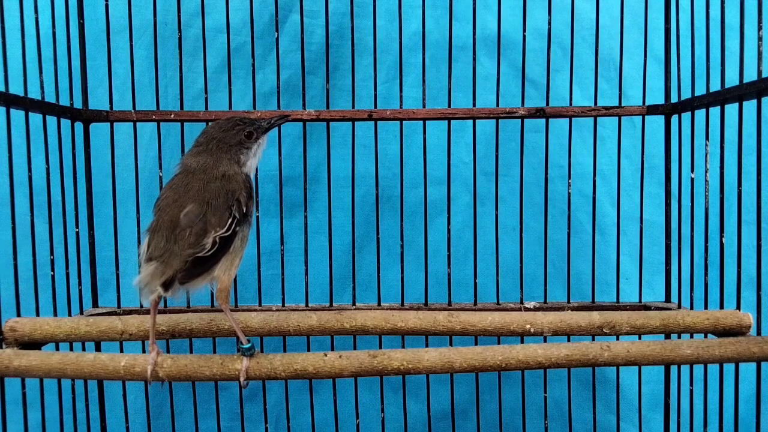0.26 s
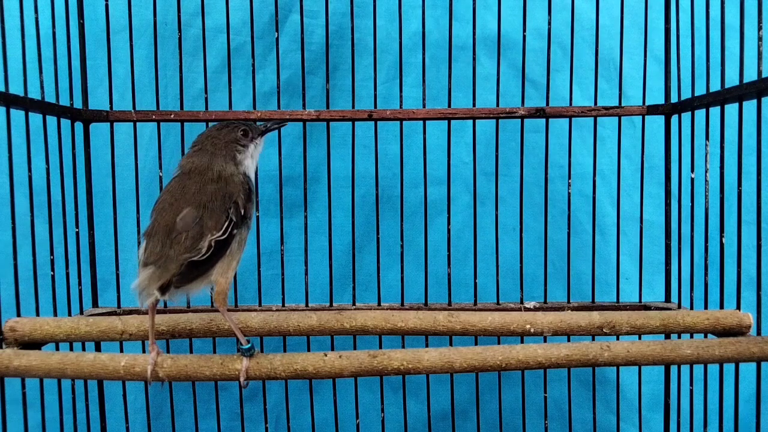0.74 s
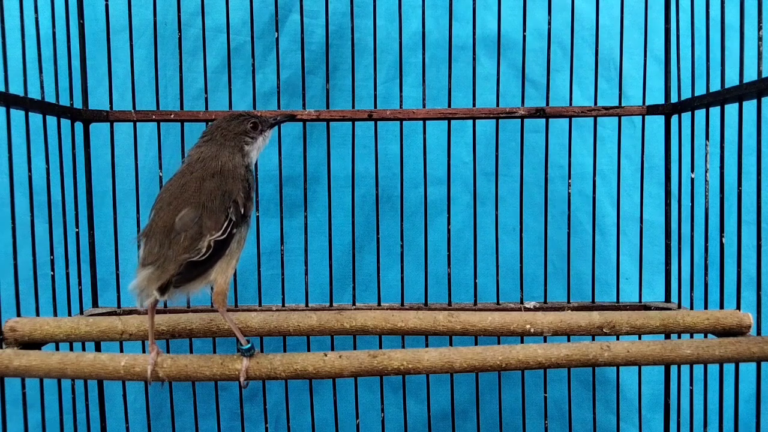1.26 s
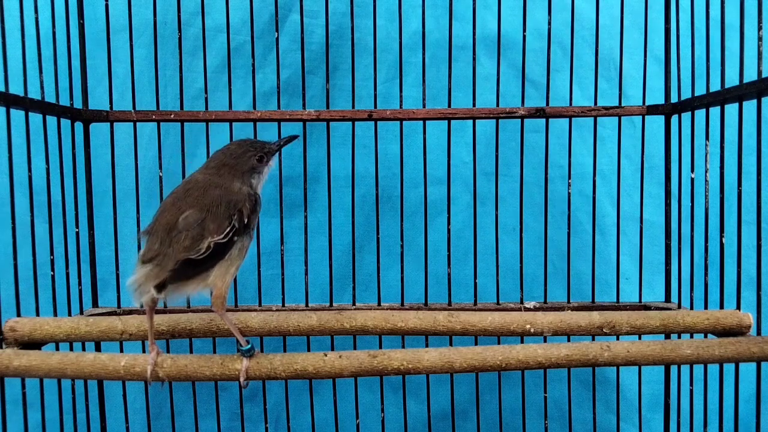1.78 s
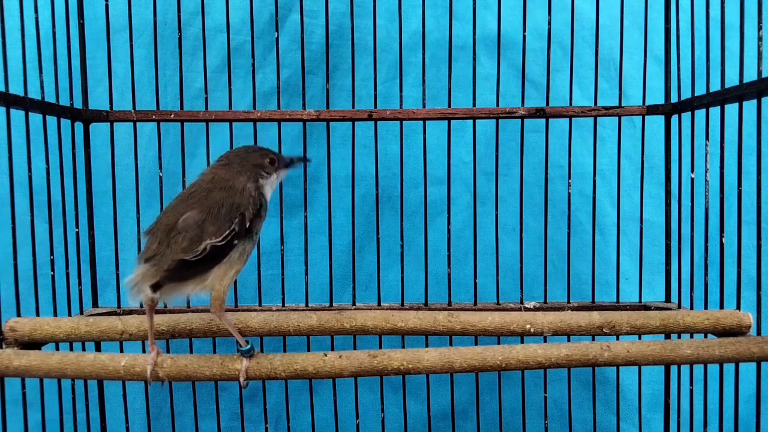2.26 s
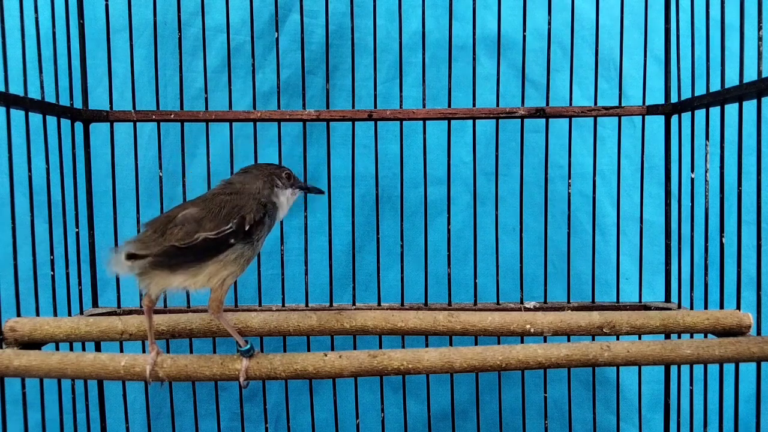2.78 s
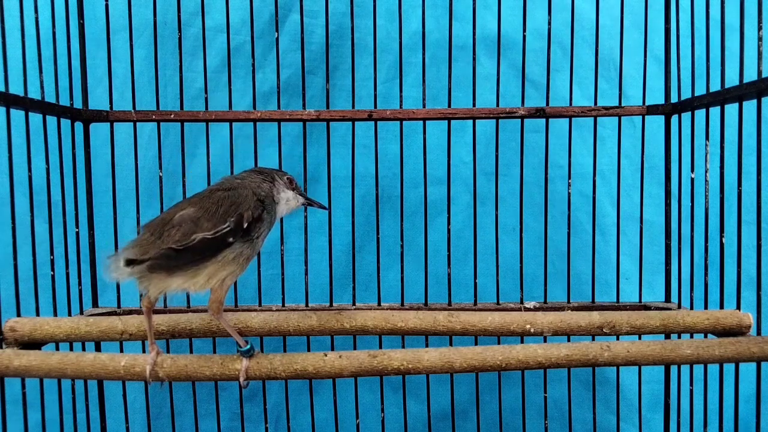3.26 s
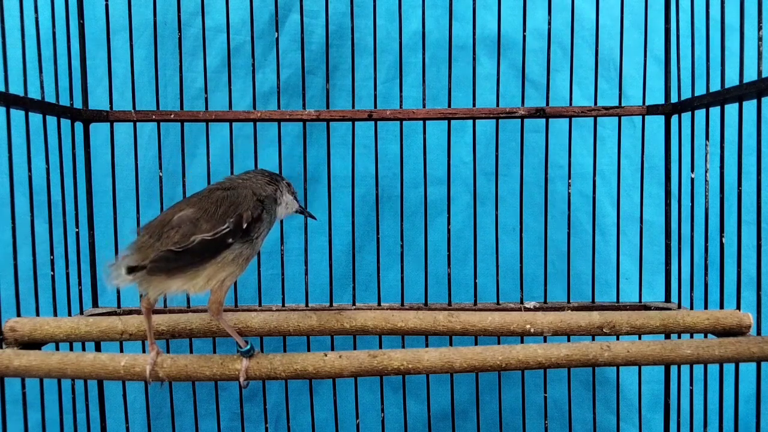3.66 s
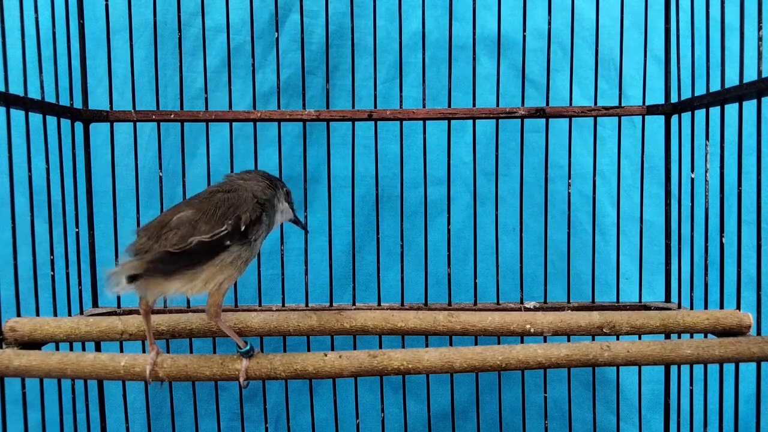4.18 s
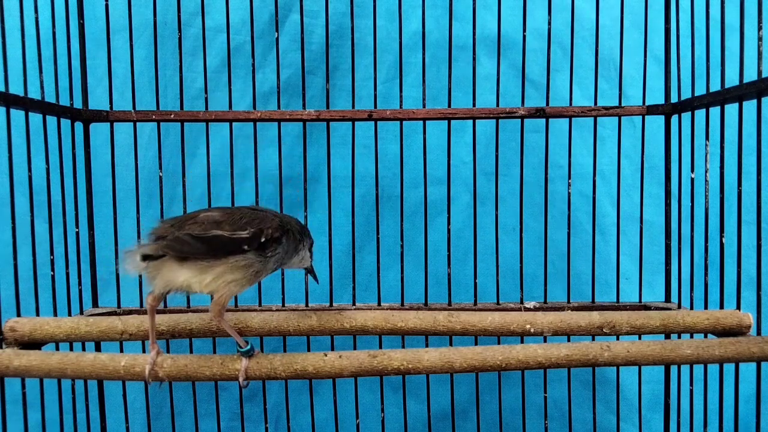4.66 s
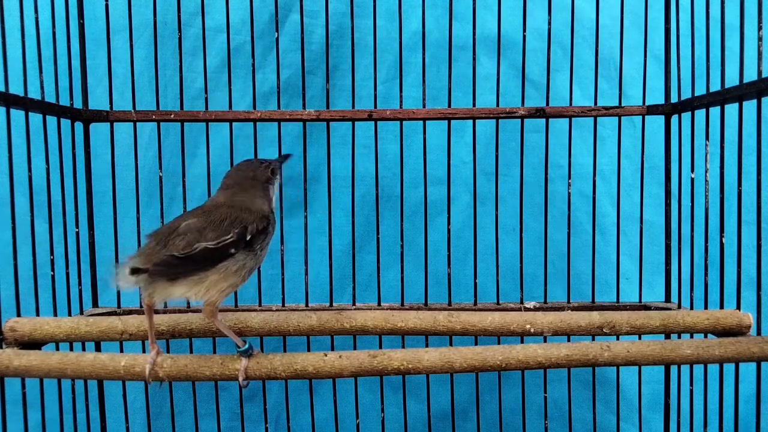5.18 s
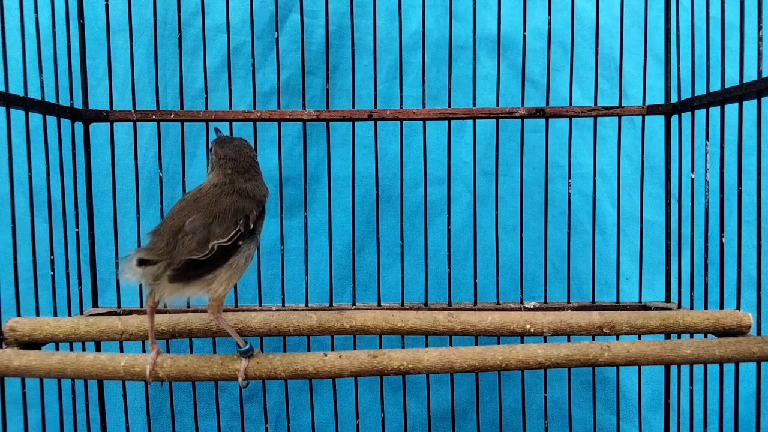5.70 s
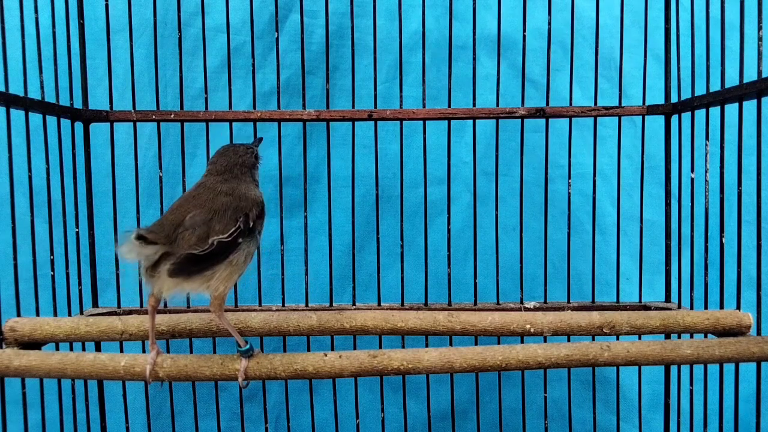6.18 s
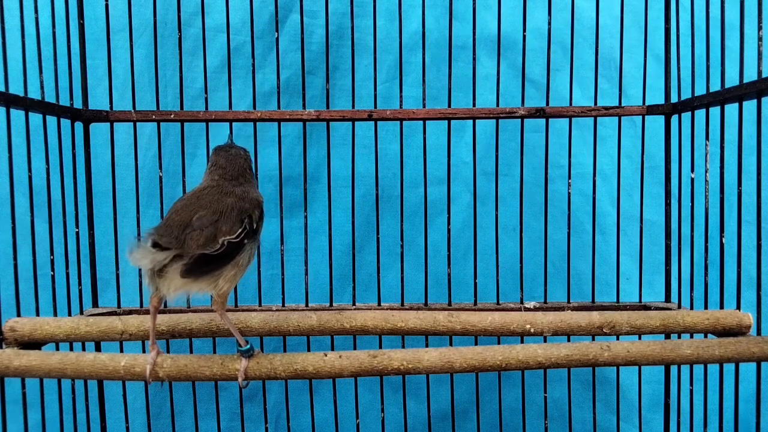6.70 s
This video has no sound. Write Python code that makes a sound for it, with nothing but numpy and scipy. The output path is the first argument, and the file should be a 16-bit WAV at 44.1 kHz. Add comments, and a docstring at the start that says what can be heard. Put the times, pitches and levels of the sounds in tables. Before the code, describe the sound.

Outdoors, other birds whistle, twitter and rasp at a distance over a patchy leafy hiss. Then a small bird close to the microphone begins loud, sharp, sweeping chips, first scattered, then in a fast even train. A faint engine hum joins. After a pause with far twits and a rasp, the trill returns in two bursts, then breaks into quick double ticks followed by longer slurs. Soft perch taps are scattered throughout.

```python
"""Over leaf hiss a far whistle slides down at once, and other birds soon twit, rasp and scold: gliding sines,
frequency-modulated tones and filtered noise. From 1.6 s a small bird close by sings trains of sharp chips,
each a sine with overtones that flicks up and sweeps down through the resonances of the beak.
A distant engine hum joins at 2.6 s as a sum of orders; soft knocks are damped modes, rustles fading noise."""
import sys
import numpy as np
from scipy import signal
from scipy.fft import rfft, irfft
from scipy.io import wavfile
from scipy.ndimage import uniform_filter1d, minimum_filter1d

SR = 44100
rng = np.random.default_rng(int(sys.argv[2]) if len(sys.argv) > 2 else 0)


def file_out(sig):
    """Save sig as 16-bit WAV at sys.argv[1]."""
    # one column per channel
    cols = np.atleast_2d(sig).T
    # limit, then scale
    lim = np.clip(cols, -1, 1)
    pcm = np.round(lim * 32767).astype(np.int16)
    wavfile.write(sys.argv[1], SR, pcm)


N = 306054


def amp(db):
    """Decibel definition: level to amplitude ratio."""
    return 10 ** (np.asarray(db) / 20)


def evened(x):
    """Power normalisation: scales to an rms of 1."""
    return x / np.sqrt(np.mean(x ** 2) + 1e-20)


def read(points, hz):
    """Frequency response: interpolates (f/Hz, value) points along log frequency."""
    f, value = np.transpose(points)
    return np.interp(np.log(hz + 1), np.log(f + 1), value)


def add(mix, s, sound):
    """Superposition: sums a sound into the mix from s seconds on."""
    part = mix[max(round(s * SR), 0):][:len(sound)]
    part += sound[:len(part)]


def columns(rows):
    """Linear interpolation: start time, then each column as a curve at the sample rate."""
    s, *rest = np.transpose(rows)
    t = np.arange(s[0], max(s[-1], s[0] + .004), 1 / SR)
    return [s[0]] + [np.interp(t, s, c) for c in rest]


def wobble(count, hz):
    """Smoothed noise: a random curve of rms 1 that changes about hz times a second."""
    size = max(int(SR / hz / 2), 1)
    smooth = uniform_filter1d(rng.standard_normal(count), size)
    return evened(uniform_filter1d(smooth, size))


def coloured(x, points):
    """Linear filtering: multiplies the spectrum by a gain curve of (f/Hz, gain/dB)."""
    gain = amp(read(points, np.fft.rfftfreq(len(x), 1 / SR)))
    return irfft(rfft(x) * gain, len(x))


def air():
    """Shaped random spectrum: patchy noise in four bands, where the twitter band follows the treble hiss."""
    # background swells: t/s, relative level of lows/dB, of treble hiss/dB, of rumble/dB
    swell_rows = [(0.0, -49.5, -37, -36.5), (0.13, -47, -27.5, -38.5), (0.27, -43.5, -31, -35),
                  (0.52, -47.5, -30, -40.5), (0.77, -47.5, -34.5, -39), (1.53, -51, -35.5, -42),
                  (1.76, -44.5, -30.5, -42), (2.11, -56.5, -44.5, -49.5), (2.26, -58.5, -41.5, -47),
                  (2.45, -48, -28.5, -42.5), (2.72, -54.5, -39.5, -48), (3.01, -50, -36.5, -41.5),
                  (3.34, -46.5, -30, -38.5), (3.46, -44, -29.5, -42.5), (3.61, -48.5, -30.5, -38.5),
                  (3.92, -49, -32, -41.5), (4.06, -44.5, -34.5, -39), (4.21, -54.5, -40, -42),
                  (4.39, -49.5, -38.5, -42.5), (4.56, -45.5, -32, -38), (4.72, -48, -37, -39),
                  (4.83, -56, -43, -44), (5.14, -50, -36.5, -42), (5.32, -55, -39.5, -42.5),
                  (5.47, -57, -44.5, -45.5), (5.74, -47, -38, -39.5), (6.07, -55, -34, -43),
                  (6.15, -53, -44, -38), (6.4, -54.5, -42, -42.5), (6.67, -41.5, -31, -39.5),
                  (6.82, -48, -33, -40.5), (6.94, -54, -38, -44)]
    # spectrum of the air noise, levelled afresh in each band: f/Hz, relative density/dB
    spectrum = [(12, -65), (20, 2), (86, -7), (172, -11.5), (210, -13), (347, -21), (624, -23),
                (849, -20.5), (1000, -20.5), (2390, -26), (3950, -23.5), (6010, -25.5), (6540, -24.5),
                (9670, -17), (16000, -34.5)]
    # narrow band near 860 Hz: t/s, relative level/dB
    murmur = [(0, -74), (.27, -30), (1.45, -85), (1.74, -35), (2.05, -52), (2.84, -41), (3.03, -34),
              (3.4, -32), (3.56, -44), (4.12, -74), (6.94, -68)]
    twitter_db, twitter_follows = -41, 0.53  # relative mean level, dB of twitter per dB of hiss
    frames, hz = N // 256 + 5, np.fft.rfftfreq(1024, 1 / SR)
    real, imaginary, patches = rng.standard_normal((frames, 513, 3)).T
    patches = uniform_filter1d(patches, size=12, axis=0)
    patches = evened(uniform_filter1d(patches, size=6, axis=1))
    s, lows, hiss, rumble = np.transpose(swell_rows)
    twitter = twitter_db + twitter_follows * (hiss - hiss.mean())
    t = np.arange(frames) * 256 / SR
    level_db = np.array([np.interp(t, s, c) for c in (rumble, lows, twitter, hiss)])
    shape = amp(read(spectrum, hz))
    band = np.digitize(hz, (400, 1900, 7200))
    band_norm = np.sqrt([np.sum(shape[band == k] ** 2) for k in range(4)])
    field = amp(level_db[band]) / band_norm[band][:, None]
    field = uniform_filter1d(field, size=5, axis=0) * shape[:, None]
    murmur_band = np.exp(-((hz[:, None] - 860) / 50) ** 2)
    field += murmur_band * amp(np.interp(t, *np.transpose(murmur)) - 21.5)
    z = (real + 1j * imaginary) * field * amp(2. * patches)
    return 0.63 * signal.istft(z, nperseg=1024, noverlap=768)[1][:N]


def engines():
    """Harmonic superposition: two low hums of whole and half orders, each order wavering in level."""
    # the two hums: t/s, f/Hz, level before the order gains/dB
    hum_rows = [(2.6, 77.8, -54), (2.92, 79, -55), (3.0, 79.7, -46), (3.97, 79.85, -46), (4.25, 80, -61),
                (4.4, 80, -43), (5.23, 79.46, -48), (5.57, 80.1, -55), (5.85, 83.7, -45)]
    drone_rows = [(5.55, 103.7, -64), (5.622, 103.7, -47.5), (5.84, 103.8, -61), (6.052, 102.1, -47.5),
                  (6.255, 104.3, -55), (6.292, 104, -83), (6.4, 102.4, -52.5), (6.784, 97.7, -46.5),
                  (6.94, 100.6, -53)]
    # orders: multiple of f, gain in the hum/dB, gain in the drone/dB
    orders = [(1, 1, 1), (1.5, -37, -5), (2, -19.5, -11), (2.5, -21, -14.5), (3, -12, -33.5)]
    out = np.zeros(N)
    for which, rows in enumerate((hum_rows, drone_rows)):
        s, hz, db = columns(rows)
        turns = 2 * np.pi * np.cumsum(hz) / SR
        tone = np.zeros(len(hz))
        for k, *gains_db in orders:
            waver_db = 2.13 * k * wobble(len(hz), 2.5)
            tone += amp(gains_db[which] + waver_db) * np.sin(k * turns)
        add(out, s, np.sqrt(2) * amp(db) * tone * signal.windows.tukey(len(hz), .05))
    return out


def knocks():
    """Damped modes: dull taps on wood decay exponentially, as do short dry rustles of noise."""
    # taps: t/s, relative level/dB, time to fall 60 dB/s
    taps = [(0.032, -31, 0.037), (1.035, -26.5, 0.049), (2.949, -34.5, 0.051), (3.285, -33, 0.25),
            (4.987, -24.5, 0.061), (5.657, -34.5, 0.044), (5.719, -32, 0.019)]
    # modes of the wood: f/Hz, relative level/dB
    modes = [(130, -21.5), (235, 11.5), (310, -2.5), (520, -8), (900, -5)]
    # rustles: t/s, relative level/dB, time to fall 25 dB/s
    rustles = [(1.038, -44.5, 0.087), (1.455, -61, 0.036), (1.544, -51.5, 0.053), (3.849, -41.5, 0.15)]
    out, t = np.zeros(N), np.arange(8000) / SR
    for s, db, t60 in taps:
        ring = sum(amp(d) * np.sin(2 * np.pi * hz * t) for hz, d in modes)
        add(out, s, amp(db - 10.5 - 60 * t / t60) * ring)
    for s, db, length in rustles:
        colour = [(300, -55), (700, 21.5), (3000, 13), (9000, -2), (16000, -26)]
        puff = coloured(rng.standard_normal(len(t)), colour)
        add(out, s, amp(db + 5.5 - 25 * t / length) * evened(puff))
    return out


def yard(x, t60, delay_s):
    """Reverberation: convolves with taps of random sign that decay by 60 dB in t60 seconds."""
    taps = np.zeros(SR // 2)
    at = np.arange(round(delay_s * SR), len(taps) - 20, 20)
    taps[at + rng.integers(0, 20, len(at))] = rng.choice([-1., 1.], len(at))
    taps *= amp(-60 * np.arange(len(taps)) / SR / t60)
    return signal.fftconvolve(x, taps / np.linalg.norm(taps))[:N]


def whistle(rows, share):
    """Comb interference: a fluttering near sine rises and falls in level as it glides through echoes."""
    s, hz, db = columns(rows)
    blur = share * np.clip(hz / 5500, 0, 1) ** 2  # the air smears high notes more than low ones
    fluttering_hz = hz * (1 + 0.012 * blur * wobble(len(hz), 380))
    tone = np.sin(2 * np.pi * np.cumsum(fluttering_hz) / SR)
    echo = 1 + 0.42 * np.cos(2 * np.pi * (hz * 0.001073 + rng.random()))  # an echo 1.073 ms late
    fade = signal.windows.tukey(len(hz), min(0.0029 * SR / len(hz), 1))
    return s, amp(db + 4.2 * blur * wobble(len(hz), 280)) * echo * tone * fade


def far_notes():
    """Frequency glides: paths (t/s, f/Hz, level/dB) and blur share of far twits, glides and long notes."""
    # steepening rises, with a drop if it lasts over 5 ms:
    # t/s, rise/s, drop/s, start f/Hz, top f/Hz, start level/dB, top level/dB
    twits = [(.062, 0.054, 0, 2780, 7720, -26, -31), (1.225, 0.032, 0.0074, 2420, 8870, -38, -28),
             (2.952, .05, 0.017, 3330, 7870, -28, -32), (3.111, 0.055, 0.0083, 3250, 7460, -25.5, -33.5),
             (3.285, 0.052, 0.022, 3300, 7600, -24.5, -32.5), (3.605, 0.027, 0.0036, 2890, 8430, -28, -29),
             (4.018, .027, 0.012, 3250, 8000, -25.5, -30.5),
             (4.395, 0.023, 0.0097, 3170, 9200, -27.5, -32.5),
             (4.472, 0.052, 0.014, 2140, 7800, -31.5, -28), (4.606, 0.026, 0.023, 3240, 8300, -29.5, -31.5)]
    # straight glides: t/s, length/s, from f/Hz, to f/Hz, from level/dB, to level/dB
    glides = [(0, 0.1, 4710, 3540, -28, -46), (0.027, .011, 2950, 3670, -41, -34),
              (1.547, 0.0077, 3300, 3630, -33, -41), (0.136, 0.02, 5290, 6370, -45, -40),
              (0.27, 0.024, 3810, 4770, -42, -31), (0.486, 0.015, 4290, 5330, -34, -42),
              (1.025, 0.017, 2610, 5050, -44, -32), (1.283, 0.016, 2950, 3970, -34, -36),
              (1.293, 0.13, 5080, 3160, -43, -38.5), (1.426, 0.022, 3030, 5250, -44, -33),
              (1.445, .018, 8500, 8800, -34, -30), (1.827, 0.021, 2510, 5550, -35.5, -44),
              (2.14, 0.031, 2500, 4120, -43, -36), (2.241, 0.034, 4240, 3760, -44, -30),
              (2.579, 0.054, 2610, 4900, -35.5, -42), (2.783, 0.023, 3000, 4120, -43, -30),
              (3.802, 0.022, 3360, 6750, -24.5, -58), (4.206, 0.049, 4600, 3900, -44, -38),
              (4.741, .014, 4500, 4340, -37, -42), (5.047, 0.0092, 3170, 4070, -40, -29),
              (5.168, .025, 1980, 4400, -52, -29), (5.342, 0.051, 4100, 3500, -48, -33),
              (5.421, 0.026, 2960, 3870, -38, -40), (5.795, 0.024, 2600, 4020, -35.5, -27),
              (6.186, 0.022, 3170, 5630, -35, -41), (6.473, .02, 3223, 5830, -34, -52),
              (6.512, .02, 3346, 4514, -40, -50), (6.58, 0.026, 2430, 5020, -42, -31),
              (6.635, 0.092, 4440, 3155, -44, -36), (6.727, 0.052, 3150, 5780, -32, -47),
              (6.78, 0.024, 5020, 2440, -40, -37)]
    # long notes: t/s, length/s, from f/Hz, middle f/Hz, to f/Hz, middle level/dB, end level/dB
    long_notes = [(.505, 0.27, 5500, 5970, 5830, -31.5, -42.5), (0.604, 0.1, 4980, 4400, 3800, -35.5, -36),
                  (0.864, 0.25, 5520, 5600, 5470, -36, -44), (0.891, .2, 5820, 6000, 5900, -37.5, -49),
                  (.9, 0.23, 5760, 5700, 5720, -44, -43), (1.296, 0.13, 5710, 5700, 5550, -48, -51),
                  (1.33, .18, 5400, 5230, 5180, -42, -54), (1.638, 0.27, 5780, 5880, 5870, -39, -44),
                  (1.944, .146, 2320, 2247, 1655, -37, -43), (3.191, .065, 4260, 3800, 3150, -34.5, -39),
                  (4.789, .2, 2603, 2545, 2530, -27, -44), (5.986, 0.25, 6220, 6160, 6180, -39, -51),
                  (6.408, 0.13, 5900, 5620, 5500, -43.5, -57), (6.596, 0.19, 5560, 5610, 5640, -45, -43)]
    knee_time, knee_pitch, knee_db = .52, .3, -10.5  # share of rise, share of climb, dB re mean of ends
    drop_hz, drop_db = 3200, -12.5  # end of the drop, its level re the top
    for s, rise, drop, hz, top_hz, db, top_db in twits:
        knee = (s + knee_time * rise, hz + knee_pitch * (top_hz - hz), (db + top_db) / 2 + knee_db)
        path = [(s, hz, db), knee, (s + rise, top_hz, top_db)]
        if drop > .005:
            path.append((s + rise + drop, drop_hz, top_db + drop_db))
        yield path, 1
    for s, length, hz, to_hz, db, to_db in glides:
        yield [(s, hz, db), (s + length, to_hz, to_db)], 1
    u = np.linspace(0, 1, num=12)
    arc = np.array([(1 - u) * (1 - 2 * u), 4 * u * (1 - u), u * (2 * u - 1)]).T  # parabola through 3 points
    for s, length, hz, mid_hz, to_hz, db, end_db in long_notes:
        path = [s + length * u, arc @ (hz, mid_hz, to_hz), arc @ (db - 6.5, db, end_db)]
        yield np.array(path).T, .75  # long notes are steadier


def hoarse(rows):
    """Frequency and amplitude modulation: a second, uneven oscillator shakes the tone near 150 Hz."""
    s, hz, db, rough = columns(rows)
    rough = np.clip(rough, 0, 1)
    beat = 2 * np.pi * np.cumsum(150 * (1 + .17 * wobble(len(hz), 40.3))) / SR
    shake = 0.16 * np.sin(beat) + 0.0336 * wobble(len(hz), 285)
    turns = 2 * np.pi * np.cumsum(hz * (1 + rough * shake)) / SR
    tone = np.sin(turns)
    for order, order_db in ((2, -16.5), (3, -15.5), (4, -22.0)):
        tone += amp(order_db) * np.sin(order * turns)
    throb = 1 + rough * (0.16 * np.cos(beat) + 0.32 * wobble(len(hz), 350))
    return s, np.sqrt(2) * amp(db) * throb * tone


def hoarse_path(s, body, db):
    """Time scaling: places a clean slide and stretches the rough body that follows it."""
    # clean slide: t/s, f/Hz, relative level/dB, roughness (0-1)
    slide = [(0, 2200, -19.5, 0), (.01, 2730, 0.5, 0.04), (.019, 3045, -7, 0.2), (.031, 3140, -8.5, 0.23)]
    # rough body: share of its length, f/Hz, relative level/dB, roughness (0-1)
    body_rows = [(.53, 3365, -7.5, .98), (0.861, 2973, -10.5, 0.54), (0.969, 2900, -45, 0.84)]
    shape = slide + [(slide[-1][0] + share * body, *rest) for share, *rest in body_rows]
    return np.array(shape) + (s, 0, db, 0)


def scold(rows):
    """Source-filter principle: throbbing noise passes through fixed throat bands."""
    # throat bands: f/Hz, relative density/dB
    throat = [(2000, -34), (2500, -7), (2900, -7), (3150, -4.5), (3400, -5.5), (3900, -9.5), (4600, -12.5),
              (6900, -22.5), (7800, -10.5), (8500, -3.5), (9200, -7), (10000, -4.5), (10350, -0.5),
              (10700, -31), (11400, -13), (13500, -14.5), (16000, -23)]
    s, db = columns(rows)
    noise = rng.standard_normal(len(db)) * amp(2.9 * wobble(len(db), 180))
    return s, amp(db + 12.0) * evened(coloured(noise, throat)) * signal.windows.tukey(len(db), .6)


def head(s):
    """Interference and directivity: reflection notch and tilt of the turning head at s seconds."""
    # t/s, f cancelled by the near reflection/Hz, depth (0-1), upper half over the lower/dB
    turns = [(1.62, 5000, .05, -6.5), (2.19, 5100, .05, -4), (2.27, 4980, 0.53, 2.5), (2.82, 5170, 1, 3),
             (4.1, 5380, 0.87, -1.5), (4.19, 5570, .98, -0.5), (4.27, 5620, .98, 1.5),
             (4.68, 6000, .98, 0.8), (4.77, 6020, .98, 6.5), (4.85, 5700, .98, 7), (4.93, 4910, 0.54, 2.5),
             (5.478, 5130, 0.2, -2), (5.82, 5170, 0.7, 1.4), (6.27, 5200, 0.67, 1.3),
             (6.86, 5200, 0.9, 2.3)]
    at, *cols = np.transpose(turns)
    return [np.interp(s, at, c) for c in cols]


def chip(s, start_hz, top_hz, mid_hz, end_hz, rise_ms, fall_ms, effort_db, flick_db, notch_hz, depth, tilt_db, sag):
    """Source-filter principle: a sine flicks up, turns and falls; the beak colours it by its pitch."""
    # how strongly beak and throat pass each pitch: f/Hz, gain/dB
    beak = [(1700, -14.5), (2200, -25.5), (2700, -17), (3200, -17), (3700, -5.5), (4300, 0.5), (5000, -3.5),
            (6000, 3), (6600, -6.5), (7200, -8.5), (7800, -8.5)]
    # what the overtones keep all along, before the gain of each order: f/Hz, gain/dB
    overtone = [(3500, -23), (5500, -36.5), (7000, -36), (8500, -29.5), (10000, -22), (11500, -31.5),
                (13000, -25), (16000, -83)]
    # what the flick adds to them, before the gain of each order: f/Hz, gain/dB
    flick_overtone = [(4500, -12), (5500, -5), (7000, -9.5), (8000, -6), (9500, -14.5), (11000, -32),
                      (16000, -55)]
    # colour of the breath: f/Hz, relative density/dB
    breath_colour = [(2500, -15), (6000, 4), (9500, 0.5), (12500, -12), (15500, -3.5)]
    t = np.arange(-rise_ms / 1000, fall_ms / 1000, 1 / SR)  # 0 at the top
    u = np.clip((t * 1000 - 1.2) / (fall_ms - 1.2), 0, 1)  # share of the fall, after a 1.2 ms hold
    top, mid, end = np.log([top_hz, mid_hz, end_hz])
    fall = top * (1 - u) * (1 - 2 * u) + 4 * mid * u * (1 - u) + end * u * (2 * u - 1)
    fall -= sag * (1 - u) * np.sin(2 * np.pi * u) / 4  # drops fast, lingers, drops again
    pitch = np.where(t < 0, top - np.log(start_hz / top_hz) * t * 1000 / rise_ms, fall)
    rounded = uniform_filter1d(uniform_filter1d(pitch, size=50), size=50)  # smooths the turn
    hz = np.exp(rounded)
    turns = 2 * np.pi * (np.cumsum(hz) / SR + rng.random())

    rising = 1 / (1 + np.exp(t / 0.0024))  # 1 in the flick, 0 in the fall
    swell_db = -14. * np.clip(-t * 1000 / rise_ms, 0, 1) ** 2  # the flick grows towards the top
    flutter_db = 2.1 * wobble(len(t), 400)
    cancel = 1 - np.clip(depth, 0, 1) * np.exp(-((hz - notch_hz) / 260) ** 2)
    beak_db = read(beak, hz) + tilt_db * np.tanh((hz - 5100) / 500) / 2
    sound = amp(beak_db + flick_db * rising + swell_db + flutter_db) * cancel * np.sin(turns)
    for order, db in ((2, 1.0), (3, -11.0)):  # the pressed flick is richer in overtones, and they flutter
        level = rising * amp(read(flick_overtone, order * hz) + 0.33 * flick_db + swell_db)
        level += amp(read(overtone, order * hz))
        level *= amp(db + 2.8 * wobble(len(t), 390))
        sound += level * np.sin(order * turns) * (order * hz < .45 * SR)
    breath = evened(coloured(rng.standard_normal(len(t)), breath_colour))  # air rushing past the membranes
    sound += amp(-24.5 + swell_db) * breath * np.exp(-((t - .004) / 0.01) ** 2)
    edges = np.clip((t - t[0]) / .0025, 0, 1) ** 2 * np.clip((t[-1] - t) / .004, 0, 1)
    return s + t[0], amp(effort_db) * sound * edges


def song():
    """Sequence of frequency sweeps: the arguments of chip() for trill notes, ticks and slurs."""
    # trill notes: t of the top/s, start f/Hz, top f/Hz, rise/ms, fall/ms, effort level/dB,
    # flick level re the fall/dB, sag of the fall (0-1)
    trill = [(1.6179, 1940, 6320, 9.4, 19.5, -4, -3.5, 0.7), (1.7025, 2530, 6030, 6.8, 18.6, -4.5, -3, 0.6),
             (1.9357, 2270, 5870, 9.3, 17.3, -3, 1, 0.66),
             (2.0153, 2820, 6220, 6.1, 20.4, -4.5, -0.5, 0.75),
             (2.1058, 2980, 6210, 4.1, 21.6, -4, -2.5, 0.54), (2.1854, 3550, 6880, 4.5, 25.4, -4.5, 6, .6),
             (2.273, 3500, 7660, 4.2, 31.2, -2.5, -9, 0.22), (2.3583, 5070, 7990, 5, 31.6, -1.5, -21, 0.1),
             (2.4452, 4000, 7690, 4.6, 33.2, -2, -15, 0.36), (2.537, 6280, 7830, 2.45, 33, 0, -24, 0.42),
             (2.6315, 4930, 7680, 5.4, 32.8, -1, -10, 0.44), (2.725, 6740, 7800, 3.4, 32, 2, -44, 0.17),
             (2.8208, 5310, 7890, 5.2, 34.4, -0.5, -16, 0.19), (4.1076, 2190, 5970, 8.4, 18, 1.5, -7, 0.42),
             (4.1855, 2690, 6530, 5.9, 22.3, -2.3, -10, 0.7), (4.2682, 3030, 6950, 7.1, 24.7, -2, -8, 0.76),
             (4.6819, 1992, 6490, 9.7, 16.8, -2.5, -1, 0.65),
             (4.7629, 2530, 6370, 5.8, 21.8, -2.5, -2, 0.43), (4.8472, 3640, 7450, 4.2, 29, 1, -10.5, .55),
             (4.9302, 4970, 7460, 3.4, 30, -2, -7, .41), (5.0091, 5280, 7810, 3.9, 29.7, -1.5, -16, .48),
             (5.1017, 5860, 7860, 6, 33.8, -2.1, -20, 0.33),
             (5.2001, 6170, 7860, 4.4, 34.6, -2.1, -16, 0.31), (5.2912, 4670, 7860, 7.5, 36, -4, -9, 0.3),
             (5.3837, 3470, 7880, 3.2, 35.6, -5.5, -1, 0.03), (5.4813, 5470, 7400, 5.1, 37.2, -4, -10, 0.1)]
    # closing phrases, short ticks and long slurs:
    # t of the top/s, top f/Hz, f halfway down/Hz, effort level/dB, flick level re the fall/dB
    ticks = [(5.8176, 7310, 3565, -1.2, -8), (5.8679, 7240, 3840, -1.5, -14),
             (6.2183, 7100, 3600, -1.7, -7), (6.2685, 7000, 3760, -1.8, -10), (6.8172, 7220, 3390, -1, 0),
             (6.8655, 7490, 3870, 0.7, -32)]
    slurs = [(5.949, 7170, 4500, -2.5, -8), (6.3424, 6840, 4590, -2, -6), (6.9435, 7050, 4520, 1.5, -11.5)]
    # shape shared by all ticks, by all slurs: start f/Hz, end f/Hz, rise/ms, fall/ms
    tick_shape = (4400, 1704, 0.45, 19.1)
    slur_shape = (3400, 3010, 6.55, 44)
    halfway_hz = 3586  # every trill note aims through here
    for s, start_hz, top_hz, rise_ms, fall_ms, effort_db, flick_db, sag in trill:
        end_hz = 1782 + 16.5 * (fall_ms - 25)  # longer falls end higher, shorter ones lower
        yield (s, start_hz, top_hz, halfway_hz, end_hz, rise_ms, fall_ms, effort_db, flick_db,
               *head(s), sag)
    for rows, (start_hz, end_hz, rise_ms, fall_ms) in ((ticks, tick_shape), (slurs, slur_shape)):
        for s, top_hz, mid_hz, effort_db, flick_db in rows:
            yield (s, start_hz, top_hz, mid_hz, end_hz, rise_ms, fall_ms, effort_db, flick_db,
                   *head(s), 0)


def scene():
    """Superposition: near bird, far birds, their reflections and the background."""
    # hoarse calls: t/s, body length/s, relative level/dB
    hoarse_calls = [(.124, .14, -14.5), (.576, 0.12, -17)]
    # scolding rasps: t/s, length/s, relative noise level/dB, relative voice level/dB
    scolds = [(0.058, .26, -44.5, -36.5), (3.644, 0.46, -47, -38), (5.917, 0.32, -44, -42)]
    # voice of a scold: share of its length, f/Hz, relative level/dB, roughness (0-1)
    scold_arch = [(0, 2750, -12.5, .55), (0.302, 3280, 0.5, 0.4), (0.699, 3110, -6, 0.5),
                  (1, 2750, -10, .55)]
    bird, others = np.zeros(N), np.zeros(N)
    for row in song():
        add(bird, *chip(*row))
    for rows, blur in far_notes():
        add(others, *whistle(rows, blur))
    for row in hoarse_calls:
        add(others, *hoarse(hoarse_path(*row)))
    for s, length, db, voice_db in scolds:
        voice = np.array(scold_arch) * (length, 1, 1, 1) + (s, 0, voice_db, 0)
        add(others, *hoarse(voice))
        add(others, *scold([(s, db), (s + length, db)]))
    walls = amp(-19.0) * yard(bird, 0.041, 0.0036)
    walls += amp(-25.5) * yard(bird, 0.19, 0.014)
    walls += amp(-4.0) * yard(others, 0.13, 0.0035)
    return (bird + others + walls + air() + engines() + knocks())[None]


def record(dry):
    """Peak limiting, then low-pass filtering: loud swings are held near full scale, the treble is cut."""
    edge_hz = 16230
    peak = -minimum_filter1d(-abs(dry), size=41)
    held = dry / uniform_filter1d(np.maximum(peak, 1), size=41)
    low_pass = signal.firwin(511, edge_hz, window=("kaiser", 9), fs=SR)
    return signal.oaconvolve(held, low_pass[None], "same")


dry = scene()
out = record(dry)
file_out(out)
```